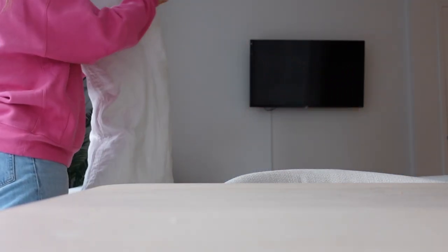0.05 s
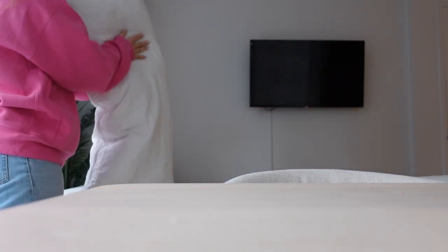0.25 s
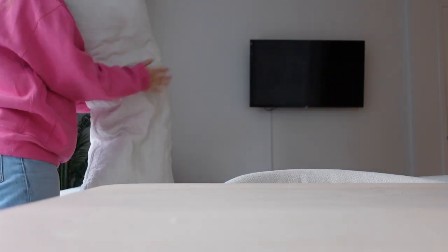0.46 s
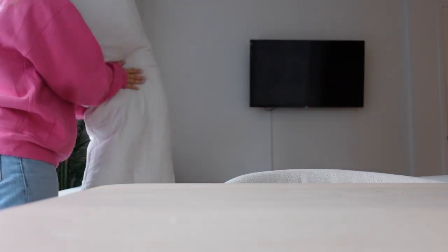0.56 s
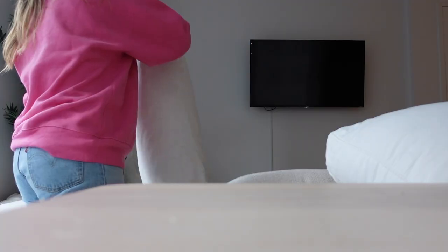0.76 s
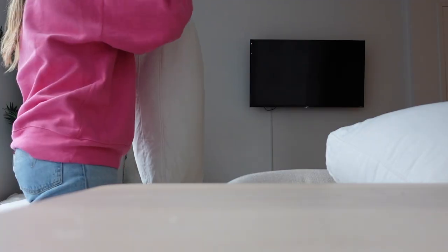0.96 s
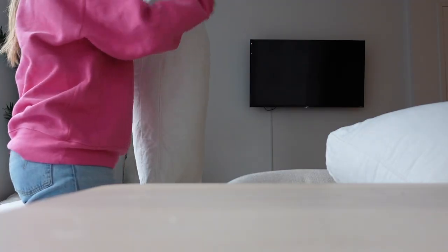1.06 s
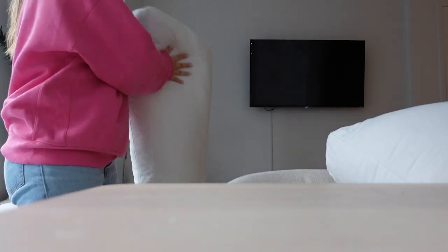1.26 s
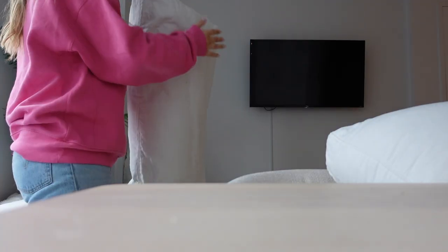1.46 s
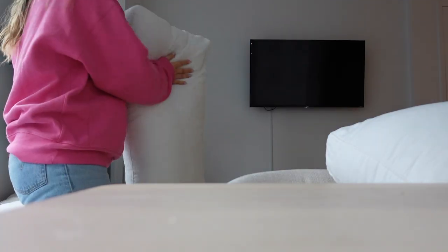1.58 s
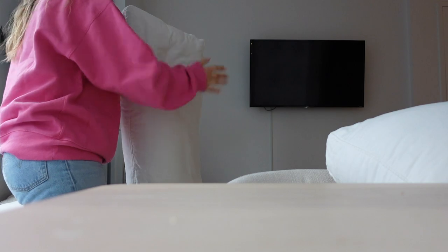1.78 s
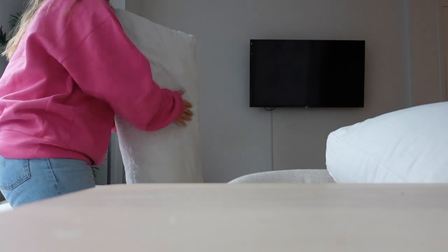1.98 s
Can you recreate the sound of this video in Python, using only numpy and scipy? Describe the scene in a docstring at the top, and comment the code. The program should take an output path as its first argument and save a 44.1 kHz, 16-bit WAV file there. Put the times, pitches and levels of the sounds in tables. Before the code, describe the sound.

Dull, padded hand pats on a big couch pillow in a bare living room. The tail of a pat and two faint metal clinks open it, then a quick crisp double slap near 0.25 s and a firm thump at 0.53. Cloth rustles and scuffs around 0.8-0.9 s. Single or doubled thumps follow at 1.25, 1.6 and 1.9 s, each ringing about half a second over quiet room tone.

```python
"""Dull, thumping pats on a big couch pillow, held between two hands in a bare living room, over rustling cloth.
Each blow sums a decaying sine (filling), a noise puff (air), a noise slap (cover) and a brush of sliding cover.
Very short noise cracks are finger snaps; blows and snaps ring on for about half a second in a synthetic room.
Cloth and room tone are shaped noise, two faint early metal clinks are decaying sines; a limiter evens the peaks.
"""
import sys
import numpy as np
from scipy import signal
from scipy.fft import rfft, irfft, next_fast_len
from scipy.io import wavfile
from scipy.ndimage import uniform_filter1d, minimum_filter1d

SR = 44100
rng = np.random.default_rng(int(sys.argv[2]) if len(sys.argv) > 2 else 0)


def pcm_store(signal):
    """Save signal as 16-bit PCM."""
    levels = np.round(np.clip(np.atleast_2d(signal), -1, 1) * 32767)
    wavfile.write(sys.argv[1], SR, levels.astype(np.int16).T)


N = 89434
T = np.arange(N) / SR
ROOM_SAMPLES = 24576
BLOW_SAMPLES = 12288

# noise spectrum of the struck cover: freq_hz, relative_db_per_hz
SLAP_SPECTRUM = [(100, -33), (450, 4.5), (900, 7), (1900, 0), (3000, 0), (5000, -9.5), (8000, -13),
                 (12000, -17), (16000, -8)]


def undb(db):
    """Decibels to gain."""
    return 10 ** (np.asarray(db) / 20)


def bins(size):
    """FFT bin frequencies in Hz, floored at 1 Hz for log axes."""
    return np.maximum(np.fft.rfftfreq(size, 1 / SR), 1)


def along(points, hz):
    """Interpolate a table on a log-frequency axis."""
    p = np.array(points)
    return np.interp(np.log(hz), np.log(p[:, 0]), p[:, 1])


def shape(x, points):
    """Filter by a table of freq_hz, gain_db."""
    samples = x.shape[-1]
    size = next_fast_len(samples)
    gain = undb(along(points, bins(size)))
    return irfft(rfft(x, size) * gain, size)[..., :samples]


def cut(x, hz, kind="low", order=2):
    """Butterworth low- or high-pass."""
    sos = signal.butter(order, min(hz, .45 * SR), kind, fs=SR, output="sos")
    return signal.sosfilt(sos, x)


def even(x, size):
    """Hold a noise at rms 1 over a sliding window of size samples."""
    power = np.mean(np.atleast_2d(x) ** 2, axis=0)
    return x / np.sqrt(uniform_filter1d(power, size) + 1e-18)


def burst(age_s, rise_s, decay_s):
    """Envelope with a quick rise and exponential fall, zero before age 0."""
    age_s = np.maximum(age_s, 0)
    return (1 - np.exp(-age_s / rise_s)) * np.exp(-age_s / decay_s)


def noise_burst(envelope, points, width_hz):
    """Enveloped noise, its spectrum levelled over width_hz and then coloured by a table."""
    size = len(envelope)
    z = rfft(rng.standard_normal(size) * envelope)
    power = uniform_filter1d(np.abs(z) ** 2, max(int(width_hz * size / SR), 1))
    colour = undb(along(points, bins(size)))
    level = np.sqrt(np.sum(envelope ** 2) / np.mean(colour ** 2))
    return irfft(z / np.sqrt(power) * colour * level)


def diffuse(size):
    """White noise from all around: alike left and right in the bass, wider in the treble."""
    # stereo side signal: freq_hz, side_gain_db
    side_gain = [(50, -42), (170, -26), (350, -20.5), (700, -10.5), (1400, -7.5), (3000, -7), (6000, -6.5),
                 (16000, -9)]
    mid, side = rng.standard_normal((2, size))
    return mid + np.array([[1], [-1]]) * shape(side, side_gain)


def wash(points):
    """Diffuse stereo noise of a given spectrum, rms 1."""
    x = shape(diffuse(N), points)
    return x / x.std()


def room_tone():
    """Steady diffuse noise of the quiet room."""
    # freq_hz, relative_db_per_hz
    quiet_spectrum = [(25, -22), (60, -10), (110, -8), (210, 0), (330, -6.5), (600, -10.5), (1500, -22),
                      (4000, -29), (10000, -32.5), (16000, -37)]
    return undb(-50.5) * wash(quiet_spectrum)


def rustle(grain_db=2, grain_samples=300):
    """Cloth rubs unevenly as the arms move and the pillow turns: noise with a randomly grained level."""
    # freq_hz, relative_db_per_hz
    cloth_spectrum = [(30, -28), (100, 3), (220, 13.5), (450, 4.5), (900, -6.5), (1800, -3), (4000, -5),
                      (8000, -11), (12000, -15.5), (16000, -23)]
    # rubbing of sleeves and cover, before grain: time_s, level_db
    rub_levels = [(0, -40.5), (.12, -54.5), (.2, -54), (.46, -89), (.525, -43.5), (.56, -59.5), (.73, -80),
                  (.78, -48), (.86, -57.5), (.96, -55.5), (1.1, -53), (1.23, -46.5), (1.4, -47.5),
                  (1.55, -63.5), (1.87, -88), (2.03, -56)]
    grain = uniform_filter1d(rng.standard_normal(N), grain_samples) * np.sqrt(grain_samples)
    level_db = np.interp(T, *np.array(rub_levels).T) + grain_db * grain
    return wash(cloth_spectrum) * undb(level_db)


def scuff():
    """The turning pillow rubs once on the sleeves: noise under a Gaussian swell."""
    # freq_hz, relative_db_per_hz
    scuff_spectrum = [(200, -30), (600, -14), (1050, 0), (1600, -13.5), (4000, -18.5), (16000, -33)]
    centre_s, sigma_s, level_db = 0.866, 0.037, -50
    swell = np.exp(-.5 * ((T - centre_s) / sigma_s) ** 2)
    return undb(level_db) * wash(scuff_spectrum) * swell


def clinks(rough_rad=1.0, flutter_hz=120):
    """A small piece of metal rings twice: decaying modes with randomly wavering phase."""
    # start_s, level_db
    clink_times = [(-0.004, -47.5), (0.043, -48)]
    # modes: freq_hz, relative_db, t60_s
    metal_modes = [(2180, 3.5, 0.19), (5300, -3, 0.27), (8900, -9, 0.39), (13000, 0, 0.2)]
    out = 0
    for start_s, level_db in clink_times:
        for hz, db, t60_s in metal_modes:
            waver = cut(rng.standard_normal(N), flutter_hz)
            tone = np.sin(2 * np.pi * hz * T + rough_rad * waver / waver.std())
            envelope = burst(T - start_s, .002, t60_s / np.log(1000))
            out = out + undb(level_db + db) * tone * envelope
    return out


def room():
    """Impulse response: direct sound, dull reflections, standing waves and a random diffuse tail."""
    # freq_hz, t60_s
    tail_t60 = [(80, 0.42), (210, 0.3952), (560, 0.4669), (1500, .5), (4000, 0.54), (8000, 0.36),
                (16000, 0.3)]
    # standing waves: freq_hz, relative_db, t60_s
    standing_modes = [(102.3, 9, 0.32), (125.2, -5.5, 0.92), (214, -1.5, 0.47), (277, -12, 0.32),
                      (324.6, -1.5, 0.54), (423.4, -4, 0.31), (635, 3, 0.39)]
    # first reflections, before low-pass: delay_s, level_db
    reflections = [(.0072, -9), (.0148, -9), (.0245, -7.5), (.029, 1.5)]
    tail_db, build_s, standing_db, echo_top_hz = 3, 0.0091, -49, 1620
    edges_hz = [1, 180, 360, 720, 2000, 9000, 22000]

    t, hz = T[:ROOM_SAMPLES], bins(ROOM_SAMPLES)
    build = 1 - np.exp(-t / build_s)

    def ring(t60_s):
        """Exponential fall of 60 dB in t60_s."""
        return np.exp(-t * np.log(1000) / t60_s)

    noise_spectrum = rfft(diffuse(ROOM_SAMPLES))
    tail = 0
    for lo, hi in zip(edges_hz, edges_hz[1:]):
        band = irfft(noise_spectrum * ((hz >= lo) & (hz < hi)))
        band = even(band, size=900) * np.sqrt(hi - lo)
        tail = tail + band * build * ring(along(tail_t60, (lo + hi) / 2))
    tail *= undb(tail_db) / np.sqrt(np.sum(tail ** 2) / 2)  # energy per channel

    waves = 0
    for mode_hz, db, t60_s in standing_modes:
        phase_cycles = rng.random()
        waves = waves + undb(db) * np.sin(2 * np.pi * (mode_hz * t + phase_cycles)) * ring(t60_s)

    echoes = np.zeros(ROOM_SAMPLES)
    for delay_s, db in reflections:
        echoes[int(delay_s * SR)] += undb(db)
    echoes = cut(echoes + 1e-18, echo_top_hz)  # offset avoids denormals

    direct = t == 0
    return direct + echoes + undb(standing_db) * build * waves + tail


def snaps():
    """Fingers flick the taut cover: very short band-limited noise cracks in one room response."""
    # start_s, relative_db
    snap_times = [(0.2299, -11), (0.237, 1.5), (0.243, -3), (0.5347, -2), (0.541, -16.5), (1.585, -4.5),
                  (1.911, -8.5), (1.920, -13)]
    level_db, low_hz, top_hz, decay_s = -9.5, 1390, 10200, 0.00061
    x = np.zeros(N)
    age_s = T[:2048] - T[256]
    envelope = burst(age_s, decay_s / 10, decay_s)
    for start_s, db in snap_times:
        start = int((start_s + age_s[0]) * SR)
        crack = noise_burst(envelope, SLAP_SPECTRUM, width_hz=490)
        x[start:start + len(age_s)] += undb(level_db + db) * crack
    x = cut(cut(x + 1e-18, low_hz, "high"), top_hz)
    return signal.fftconvolve(x[None], room(), axes=1)[:, :N]


def blow(age_s, thump_db, thump_hz, puff_db, slap_db, slap_top_hz, hollow_hz, brush_db):
    """One hand lands: the filling thumps, air puffs out, the cover slaps and slides."""
    # puff: freq_hz, relative_db_per_hz
    puff_spectrum = [(25, -20), (55, -22), (100, -10.5), (170, -11.5), (300, 2), (480, 1.5), (750, -14.5),
                     (1300, -22.5), (3000, -70), (16000, -68)]
    # sliding cover: freq_hz, relative_db_per_hz
    brush_spectrum = [(100, -29), (450, -6.5), (900, -2.5), (1900, -1), (3500, 0.5), (5500, 0),
                      (8000, -8.5), (12000, -13.5), (16000, -42)]

    thump = -np.sin(2 * np.pi * thump_hz * age_s) * burst(age_s, rise_s := 0.00048, decay_s := 0.0029)
    thump = cut(thump, 104.6, "high")

    rise_s, decay_s = 0.00092, 0.014
    puff = noise_burst(burst(age_s, rise_s, decay_s), puff_spectrum, width_hz=43)
    puff = puff * np.clip(1 + age_s / rise_s, 0, 1)  # mute noise smeared ahead of the blow

    # the cover slides under the hand around each slap
    lead_s, decay_s = 0.0029, 0.028
    slide = np.exp(-np.maximum(-age_s / lead_s, age_s / decay_s))
    brush = noise_burst(slide, brush_spectrum, width_hz=420)

    # air under the palm colours the slap
    peak_db, sigma_octaves = 7, 0.31
    octaves = np.log2(bins(len(age_s)) / hollow_hz)
    hollow = undb(peak_db * np.exp(-.5 * (octaves / sigma_octaves) ** 2))
    rise_s, decay_s = 0.00026, 0.0037
    slap = noise_burst(burst(age_s, rise_s, decay_s), SLAP_SPECTRUM, width_hz=72)
    slap = cut(irfft(rfft(slap) * hollow), slap_top_hz)

    out = undb(-4 + thump_db) * thump
    out = out + undb(-13.5 + puff_db) * puff
    out = out + undb(-18 + slap_db) * slap
    return out + undb(-33 + brush_db) * brush


def pillow():
    """All hand blows, each convolved with a fresh room response as from its own spot."""
    # levels relative to each layer's own:
    # start_s, thump_db, thump_hz, puff_db, slap_db, slap_top_hz, hollow_hz, brush_db
    hand_blows = [(-0.085, -6, 293, -13.5, -0.5, 3460, 1046, -8),
                  (0.2099, -22, 326, -14.5, -13.5, 1600, 890, -16.5),
                  (0.2362, -5.5, 300, -6.5, -2, 7000, 950, 2), (0.262, -2.5, 337, -9, 1, 7440, 5700, 1.5),
                  (0.5343, -0.5, 246, -2, -1.5, 4000, 3130, -15),
                  (1.2441, -3.5, 292, -5, -3.5, 4140, 695, -9),
                  (1.5832, -0.5, 297, -6, -4.5, 4300, 760, -14),
                  (1.617, -3.5, 228, -13, -15.5, 5760, 4300, -9.5),
                  (1.9028, -4, 260, -6, -6, 2136, 570, -12), (1.917, -4, 226, -7, -11.5, 5640, 3550, -17)]
    out = np.zeros((2, 2 * N))
    lead = BLOW_SAMPLES // 4  # samples ahead of contact
    age_s = T[:BLOW_SAMPLES] - lead / SR
    for start_s, *settings in hand_blows:
        wet = signal.fftconvolve(blow(age_s, *settings)[None], room(), axes=1)
        start = int(start_s * SR) - lead
        out[:, max(start, 0):start + wet.shape[1]] += wet[:, max(-start, 0):]
    return out[:, :N]


def scene():
    """Blows and snaps in the room, over clinks, rustling cloth and room tone."""
    return room_tone() + rustle() + scuff() + clinks() + snaps() + pillow()


def record(dry):
    """Cut the deep bass, limit on peaks below 1330 Hz, then cut the top."""
    ceiling_db, hold_s, lookahead_samples, top_hz = -9, .01, 48, 15700
    x = cut(dry, 88, "high")
    hold = int(hold_s * SR)
    peak = np.abs(cut(x, 1330)).max(axis=0)
    gain = np.minimum(1, undb(ceiling_db) / (peak + 1e-9))
    held = minimum_filter1d(gain, hold, origin=hold // 2 - lookahead_samples)
    x = x * uniform_filter1d(held, size=80)
    return signal.sosfilt(signal.ellip(10, .2, 80, top_hz, fs=SR, output="sos"), x)


dry = scene()
out = record(dry)
pcm_store(out)
```